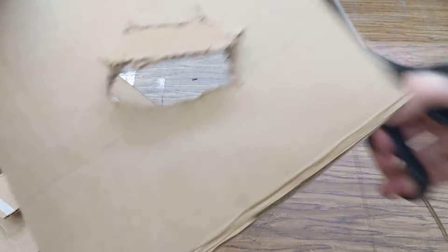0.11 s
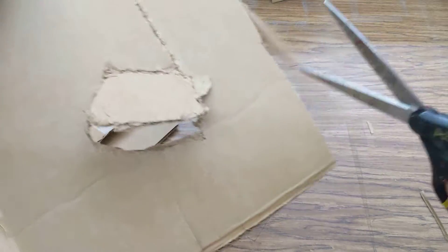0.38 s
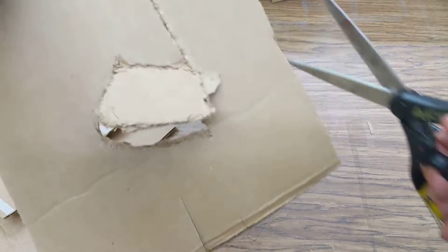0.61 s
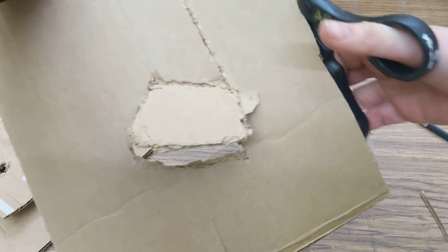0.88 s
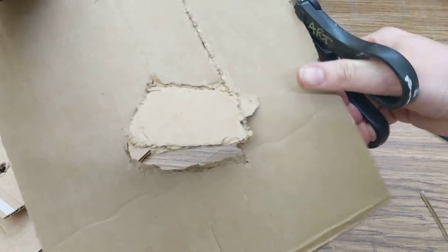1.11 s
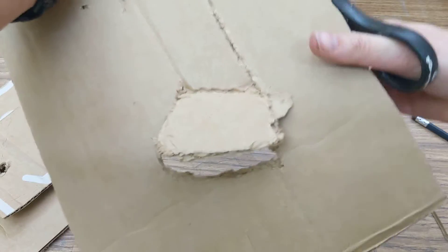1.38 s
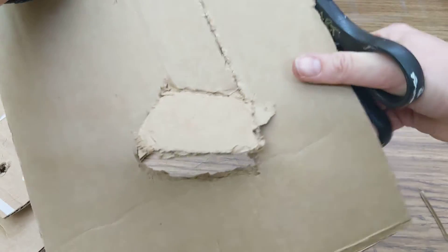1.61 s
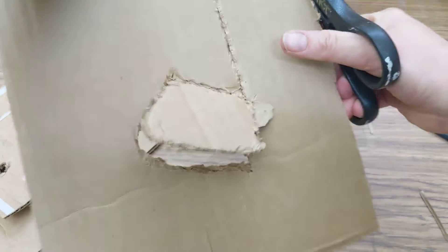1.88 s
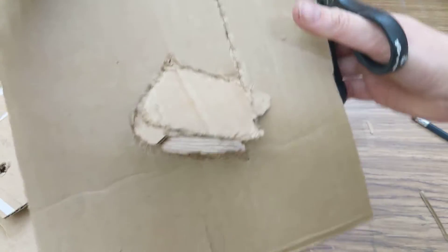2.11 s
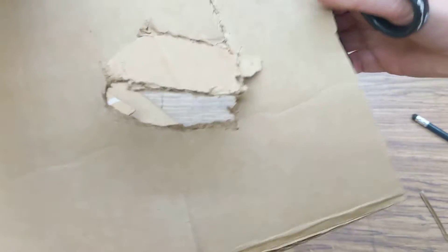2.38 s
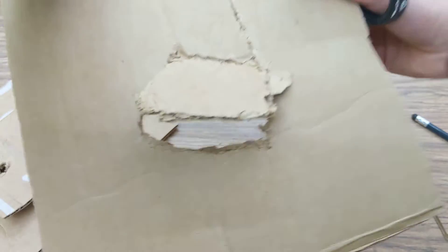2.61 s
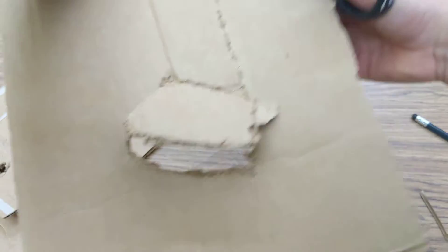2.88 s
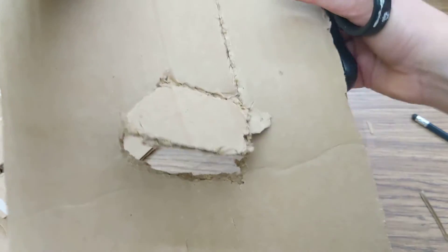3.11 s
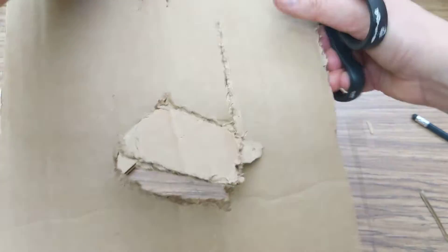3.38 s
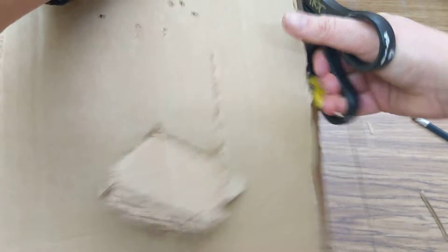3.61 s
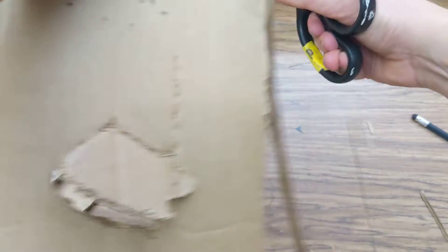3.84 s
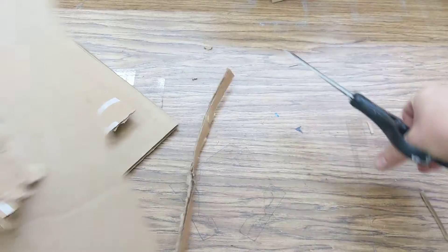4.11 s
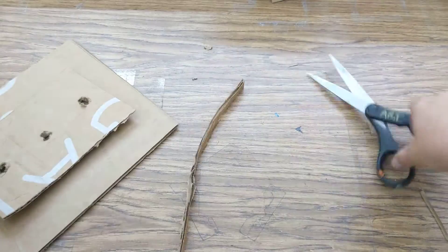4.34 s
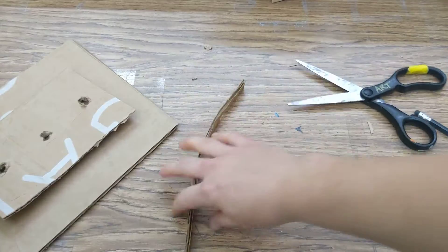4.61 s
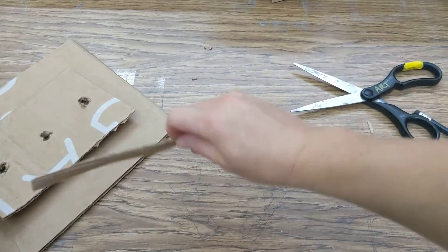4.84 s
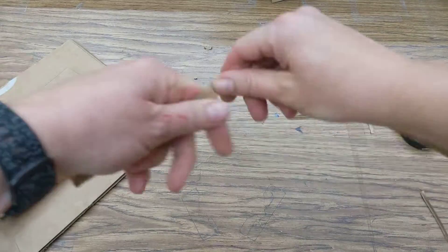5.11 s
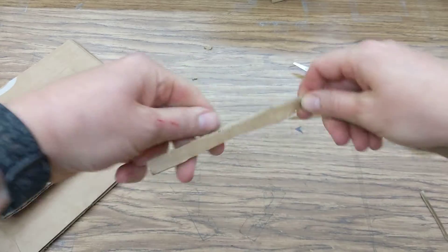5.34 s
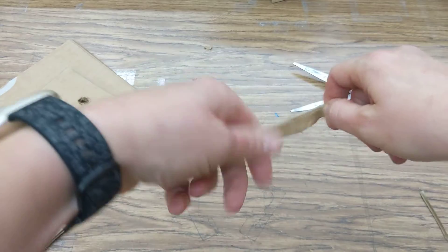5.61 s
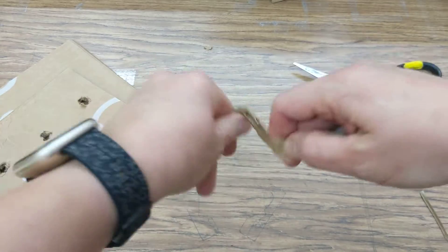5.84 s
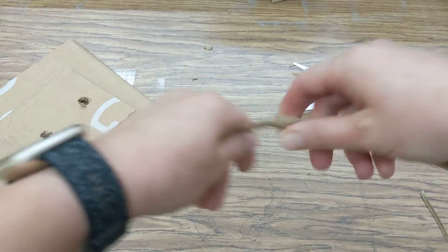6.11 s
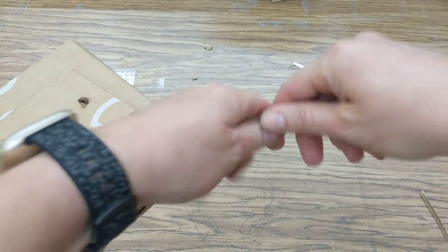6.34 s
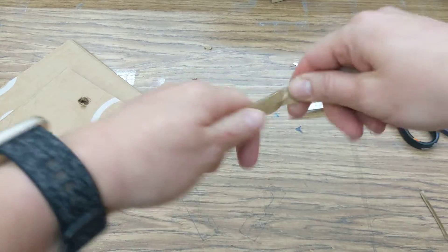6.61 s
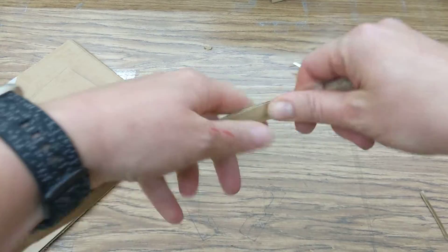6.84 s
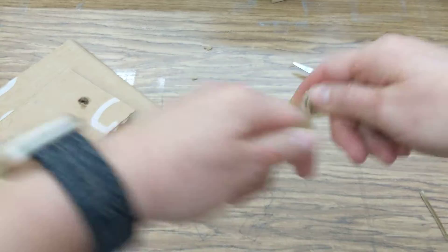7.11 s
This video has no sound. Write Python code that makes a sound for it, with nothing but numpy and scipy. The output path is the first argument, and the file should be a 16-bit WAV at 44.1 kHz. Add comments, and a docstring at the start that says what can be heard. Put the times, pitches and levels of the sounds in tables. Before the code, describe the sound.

Gritty close-up scissor cuts make a cardboard sheet boom and snap, followed by a metallic table clatter and faint papery rustling in a quiet room.

```python
"""A quiet classroom hums behind while hands rustle a sheet of corrugated cardboard close to the microphone.
Scissors bite through it stroke by stroke: gritty noise hisses, snapping fibres burst, damped sheet modes boom.
Now and then the steel blades clink. Then scissors and strip clatter and scuff onto a wooden table, whose own modes ring.
Last, fingers rub and bend the cut strip: swelling swipes of coloured noise and small bright creases."""
import sys
import numpy as np
from scipy import signal
from scipy.fft import rfft, irfft, next_fast_len
from scipy.io import wavfile
from scipy.ndimage import uniform_filter1d, map_coordinates

SR = 44100
rng = np.random.default_rng(int(sys.argv[2]) if len(sys.argv) > 2 else 0)


def to_wav(sig):
    """Store sig (one row per channel, or 1-D mono) as 16-bit WAV at the path in sys.argv[1].

    Samples outside -1..1 are clipped; the rate is SR.
    """
    pcm = np.clip(np.atleast_2d(sig), -1, 1) * 32767
    pcm = np.round(pcm).astype(np.int16)
    wavfile.write(sys.argv[1], SR, pcm.T)  # frames by channels


def boost_factor(decibels):
    """Convert a level in decibels to a linear amplitude factor."""
    exponent = np.asarray(decibels, float) / 20
    return 10 ** exponent


N = 318402
TIME = np.arange(N) / SR

# Body modes of the held sheet. Each row: frequency in Hz, width in Hz, relative level in dB.
SHEET_MODES = [(231, 37, -3.5), (330, 38, 2.5), (400, 44.3, 3), (485, 26.2, 2), (550, 86, -5),
               (772, 110, -8), (953, 87, -10.5), (1377, 205, -12)]
# Body modes of the wooden table top. Each row: frequency in Hz, width in Hz, relative level in dB.
TABLE_MODES = [(92.8, 13.5, 3), (148, 7.8, -31), (225, 11.9, -5), (461, 48.5, 0), (528, 52, -0.5),
               (540.4, 27, -1.5), (813, 145, -15.5), (985, 56, -21.5), (1036, 27, -19)]
# Colour of torn and rubbed paper. Each row: frequency in Hz, density in dB per Hz.
FIBRE_COLOUR = [(700, -52), (1300, -10), (2000, -4), (2800, -4.5), (5000, -3.5), (8000, -4), (12000, -0.5),
                (14500, -1.5), (15800, -0.5)]
# Colour of fingers on the narrow strip. Each row: frequency in Hz, density in dB per Hz.
STRIP_COLOUR = [(1000, -23.5), (2300, -8.5), (2950, -1), (4000, -1.5), (5100, -0.5), (5850, -1),
                (6600, -1.5), (10000, -1), (15800, 0.5)]


def unit(x):
    """Scales a signal to rms 1."""
    return x / np.sqrt(np.mean(x ** 2) + 1e-20)


def along(points, hz):
    """Reads a curve of (Hz, value) points on a log frequency axis."""
    f, v = np.transpose(points)
    return np.interp(np.log(hz + 1), np.log(f + 1), v)


def wobble(rate):
    """A smooth random curve with rate knots a second."""
    knots = rng.standard_normal(int(N * rate / SR) + 4)
    return map_coordinates(knots, [TIME * rate])


def filtered(x, response):
    """Shapes x by a complex response of frequency."""
    m = next_fast_len(x.shape[-1] + SR // 4)
    hz = np.fft.rfftfreq(m, 1 / SR)
    return irfft(rfft(x, m) * response(hz), m)[..., :x.shape[-1]]


def resonances(modes, hz):
    """Causal sum of (Hz, width Hz, gain dB) resonances with alternating signs."""
    total = 0
    for k, (centre, width, db) in enumerate(modes):
        peak = 1j * hz * width / (centre * centre - hz * hz + 1j * hz * width)
        total = total + (-1) ** k * boost_factor(db) * peak
    return total


def ported(x, lead):
    """Sound reaches the two microphone ports with a phase gap: lead holds (Hz, radians left leads)."""
    both = np.array([x, x]) if x.ndim == 1 else x
    return filtered(both, lambda hz: np.exp(.5j * along(lead, hz) * [[1], [-1]]))


def pair(size, alike, lag):
    """Left and right noise, partly shared, the shared part lag samples later on the right."""
    shared, own = rng.standard_normal(size + 128), rng.standard_normal((2, size))
    delayed = np.interp(np.arange(size) + 64 - lag, np.arange(size + 128), shared)
    both = np.array([unit(shared[64:64 + size]), unit(delayed)])
    alike = np.clip(alike, 0, 1)
    return np.sqrt(alike) * both + np.sqrt(1 - alike) * own


def paper(x, spectrum):
    """Colour of fibres as the near microphone hears them, with its ports' own resonances on top."""
    # Emphasis of near sounds at the microphone. Each row: frequency in Hz, width in Hz, level in dB.
    port_modes = [(3000, 300, -4), (3950, 200, -8), (5860, 300, 0), (7500, 300, -4), (8400, 200, -6),
                  (9700, 550, -3), (11800, 300, -3), (14000, 300, -5)]
    return filtered(x, lambda hz: boost_factor(along(spectrum, hz)) * (.55 + .9 * np.abs(resonances(port_modes, hz))))


def air():
    """Ventilation rumble and a faint hiss as shaped stereo noise, plus a mains hum as a wavering sine."""
    # Room floor. Each row: frequency in Hz, density in dB per Hz.
    floor = [(15, -12), (30, 5.5), (60, -1), (130, -4), (250, -13), (520, -9), (800, -20), (1300, -26),
             (2200, -23.5), (3000, -21), (6000, -27.5), (9000, -33), (12000, -28), (16000, -25.5)]
    # Stereo width of the floor. Each row: frequency in Hz, left-right likeness (1 is mono).
    likeness = [(60, 0.54), (250, 0.67), (600, 0.61), (1500, 0.23), (3000, 0.21), (8000, 0.33)]
    # Stereo phase of the floor. Each row: frequency in Hz, radians by which left leads.
    phase_lead = [(40, -9), (130, 3), (300, -1.6), (600, -3.5), (1200, 2), (6000, -5.5), (9000, 9)]

    def turn(hz):
        return np.arccos(np.clip(along(likeness, hz), -1, 1)) / 2

    noise = rng.standard_normal((2, N))
    mid, side = filtered(noise, lambda hz: boost_factor(along(floor, hz)) * [np.cos(turn(hz)), np.sin(turn(hz))])
    hum = boost_factor(-78.0 + 0.52 * wobble(3.1)) * np.sin(2 * np.pi * 120 * TIME)
    rumble = boost_factor(-61.5 + 0.81 * wobble(0.91)) * unit(np.array([mid + side, mid - side]))
    return ported(rumble + hum, phase_lead)


def rubbing():
    """Blades and fingers drag over the paper: clumped grit hisses, and the body underneath hums along."""
    # Faint rustle of hands on paper. Each row: time in seconds, hiss level in dB, body level in dB.
    rustle = [(0, -56.5, -65.5), (.1, -60, -60.5), (.55, -66.5, -63.5), (.9, -83, -78), (1.1, -65, -64),
              (2.1, -56, -60.5), (2.3, -76, -74), (2.6, -56.5, -61), (3.6, -60.5, -60.5), (4.3, -61, -67),
              (4.7, -53.5, -41.5), (5.1, -59, -59), (5.3, -59.5, -58.5), (5.66, -58.5, -71),
              (6.0, -64.5, -77.5), (6.5, -55, -82), (6.87, -65.5, -85), (7.22, -52, -73)]
    # Blades close or slide open along the cut.
    # Each row: start in seconds, length in seconds, then hiss, body and sway level in dB at the stroke's end.
    cuts = [(.145, 0.16, -45, -52.5, -62), (.32, .03, -52.5, -53.5, -53), (.35, 0.079, -52.5, -63, -75),
            (.45, 0.056, -50.5, -59, -76), (.922, 0.034, -47, -47.5, -47), (.955, 0.072, -52, -60.5, -64),
            (1.02, 0.048, -48.5, -60, -60), (1.155, 0.031, -62.5, -64, -57),
            (1.19, 0.12, -47, -50.5, -52.5), (1.435, 0.085, -43, -56, -60), (1.575, .12, -43.5, -42.5, -48),
            (1.825, 0.069, -39.5, -51.5, -56), (1.955, 0.13, -39, -41.5, -49.5),
            (2.17, 0.048, -62.5, -62, -72), (2.457, 0.043, -42, -45.5, -42), (2.53, 0.029, -64, -57, -59),
            (2.59, 0.057, -53, -57.5, -60), (2.63, 0.042, -47.5, -42.5, -51), (2.73, 0.13, -41, -40, -46),
            (2.88, 0.038, -50.5, -62, -70), (3.0, 0.05, -40, -47, -51.5), (3.12, .085, -35, -34, -52),
            (3.205, 0.031, -41.5, -44, -44), (3.345, 0.055, -41.5, -48, -48.5),
            (3.455, 0.1, -41.5, -40, -45), (3.58, 0.046, -47.5, -59, -73),
            (3.785, 0.038, -37, -46.5, -53.5), (3.88, 0.11, -53, -50.5, -60),
            (3.97, 0.066, -47.5, -56, -60), (4.12, 0.064, -65.5, -57.5, -49.5)]
    # Scissors and strip scuff over the table.
    # Each row: start in seconds, length in seconds, then hiss and body level in dB at the scuff's end.
    scuffs = [(4.425, 0.098, -44, -47), (4.53, 0.035, -40, -37.5), (4.59, 0.028, -34.5, -33.5),
              (4.65, 0.053, -40.5, -28.5), (4.81, 0.1, -48.5, -39.5), (4.96, 0.092, -51, -50.5),
              (5.05, .05, -54, -46), (5.125, 0.031, -56, -40), (5.19, 0.042, -54.5, -60.5)]
    # Fingers slide along the strip, press ever harder and stop.
    # Each row: start in seconds, length in seconds, final hiss level in dB.
    swipes = [(5.37, 0.12, -49), (5.68, .12, -56), (5.88, .08, -57), (6.08, 0.049, -52), (6.26, 0.09, -50),
              (6.435, 0.014, -56), (6.56, 0.075, -44), (6.7, 0.09, -51.5), (6.79, 0.037, -61),
              (6.96, 0.043, -57), (7.05, 0.036, -54.5), (7.11, 0.064, -48)]
    put_down_s, lifted_s = 4.38, 5.3  # sheet laid aside, strip in both hands

    # Gain curves
    s, *levels = np.transpose(rustle)
    cut = strokes(cuts, rise_s=0.0079, fade_s=0.0087, swell_db=3.5)
    scuff = strokes(scuffs, rise_s=0.0014, fade_s=0.021, swell_db=-4.5)
    hands = np.array([boost_factor(np.interp(TIME, s, c)) for c in levels])
    hiss, body = hands + cut[:2] + scuff
    hiss = hiss + strokes(swipes, rise_s=.02, fade_s=0.0076, swell_db=6.5)[0]

    # Grit: clumped noise, with crackle until the strip is lifted
    clumps = 1.1 * wobble(40) + 2.1 * wobble(150)  # dB
    fibres = (rng.random(N) < 250 / SR) * boost_factor(3.4 * rng.exponential(size=N))  # single fibres let go, a few hard
    spikes = np.convolve(fibres, np.exp(-np.arange(200) / 30))[:N]
    crackle = 1 + .4 * np.minimum(spikes, 5) * (TIME < lifted_s)
    noise = pair(N, alike=0.94, lag=8 + 9 * wobble(1.2))  # the hand moves, so the lag drifts
    grit = patchy(crackle * boost_factor(clumps + 0.85 * wobble(1800)) * noise, depth_db=2)

    # Cross-fade from sheet to strip, which leans half a dB to the right
    strip = np.clip((TIME - lifted_s) / .1, 0, 1)
    pan = boost_factor(0.5 * strip * [[-.5], [.5]])
    colour = unit(paper(grit, FIBRE_COLOUR)) * (1 - strip) + unit(paper(grit, STRIP_COLOUR)) * strip

    # The same clumps drive the body of sheet and table
    drag = boost_factor(clumps + 3.94 * wobble(80)) * pair(N, alike=0.87, lag=0)
    # a hand resting on the table deadens it
    damped = [(hz, 2.03 * w, db - 5 * (hz < 300) + 5 * (hz > 600)) for hz, w, db in TABLE_MODES]
    board = unit(filtered(drag, lambda hz: resonances(SHEET_MODES, hz)))
    wood = unit(filtered(drag, lambda hz: resonances(damped, hz)))
    held = TIME < put_down_s
    return hiss * pan * colour, body * board * held + sway(cut[2]), body * wood * ~held


def patchy(x, depth_db):
    """Random gain patches over time and frequency: each bit of board sounds its own colour."""
    z = signal.stft(x, nperseg=256)[2]
    field = uniform_filter1d(rng.standard_normal(z.shape[1:]), size=8, axis=0)
    field = uniform_filter1d(field, size=6, axis=1)
    return signal.istft(z * boost_factor(depth_db * unit(field)), nperseg=256)[1][:, :N]


def strokes(rows, rise_s, fade_s, swell_db):
    """One gain curve per level column: each stroke rises, drifts by swell_db up to its end, then fades."""
    out = np.zeros((len(rows[0]) - 2, N))
    for s, length, *levels in rows:
        t = np.clip(TIME - s, 0, None)
        rise = 1 - np.exp(-(t / rise_s) ** 2)
        swell = boost_factor(swell_db * (np.minimum(t / length, 1) - 1))
        fade = np.exp(-np.clip(t - length, 0, None) / fade_s)
        out += boost_factor(np.array(levels))[:, None] * rise * swell * fade
    return out


def sway(push):
    """The whole sheet flexes slowly, pushed by each stroke: low resonant noise under a lagging gain."""
    # Flexing modes of the sheet. Each row: frequency in Hz, width in Hz, relative level in dB.
    flex_modes = [(50, 40, -5.5), (93.4, 26, 0), (127.4, 39, -3.5)]
    lag_s = 0.032  # the heavy sheet follows the blades late
    flex = unit(filtered(rng.standard_normal(N), lambda hz: resonances(flex_modes, hz)))
    late = filtered(push, lambda hz: 1 / (1 + 2j * np.pi * hz * lag_s))
    return late * boost_factor(0.78 * wobble(16)) * flex


def knock(modes, rise_s):
    """Damped modes from (Hz, width Hz, dB) ring with a soft start, scaled to peak 1."""
    t = np.arange(SR // 4) / SR
    ring = 0
    for hz, w, db in modes:
        tone = np.sin(2 * np.pi * (hz * t + rng.normal(0, 0.18)))
        ring = ring + boost_factor(db) * np.exp(-np.pi * w * t) * tone
    ring = ring * (1 - np.exp(-(t / rise_s) ** 2))
    return ring / np.abs(ring).max()


def sheet():
    """The held sheet booms at each bite; grip and bend decide which mode leads, a hard bite wakes the upper ones."""
    # Booms. Each row: start in seconds, peak level in dB, leading mode in Hz, upper modes in dB.
    booms = [(0.2, -32, 400, -15), (0.3305, -36.5, 410, 3), (.39, -34, 485, -22), (.405, -39, 485, -14),
             (.42, -42, 494, -14), (0.4693, -41, 330, 16), (.496, -43, 430, -2), (.9333, -35.5, 330, 23),
             (1.023, -39, 430, 7), (1.2422, -31.5, 370, 7), (1.279, -45, 370, 4), (1.5871, -34.5, 410, 8),
             (1.622, -44, 390, 15), (1.6593, -30.5, 360, 9.5), (1.712, -19.5, 520, 9.5),
             (1.8485, -33, 370, 7.5), (1.9538, -41.5, 230, -18), (2.0115, -22, 360, 24.5),
             (2.0396, -20, 260, 9), (2.204, -44.5, 520, 9), (2.4715, -41, 350, 6.5),
             (2.498, -31.5, 400, -5), (2.635, -16.5, 230, 0), (2.7707, -27.5, 230, -13.5),
             (2.801, -30, 240, -11), (2.8352, -23.5, 340, 4), (2.9543, -29.5, 230, -3.5),
             (2.9812, -30.5, 240, -4.5), (3.2286, -24.5, 320, 7), (3.3926, -39, 390, 10),
             (3.46, -29.5, 320, 4), (3.513, -24.5, 530, -6), (3.5581, -23, 470, 16), (3.624, -42.5, 470, 6),
             (3.8158, -29, 440, -6.5), (3.958, -15.5, 230, 21.5), (4.1536, -43.5, 540, 3)]
    boom_width_hz = 36  # damping of the leading mode in the hand
    out = np.zeros(N + SR)
    for s, db, lead_hz, upper_db in booms:
        modes = []
        for hz, w, level in SHEET_MODES:
            woken_db = upper_db if hz > 600 else -3 - 9 * abs(np.log2(hz / lead_hz))
            modes.append((hz * (1 + rng.normal(0, 0.042)), w, level + woken_db + rng.normal(0, 2.9)))
        ring = knock(modes + [(lead_hz, boom_width_hz, 0)], rise_s=0.0014)
        out[round(s * SR):][:len(ring)] += boost_factor(db) * ring
    return out[:N]


def burst(length, alike, grain_db, tail_s):
    """A ragged run of tiny fractures: quick swell, plateau, sudden fall into a short tail."""
    t = np.arange(SR // 12) / SR
    length = max(length, .0008)
    swell = 1 - np.exp(-(t / (0.1 * length)) ** 2)
    shape = swell * (np.exp(-(t / length) ** 3) + 0.19 * np.exp(-t / tail_s))
    ragged = boost_factor(grain_db * np.interp(t * 900, np.arange(100), rng.standard_normal(100)))
    open_rms = np.sqrt(np.sum((shape * ragged) ** 2) / np.sum(shape ** 2))  # where the envelope is open
    return pair(len(t), alike, lag=rng.uniform(-19.5, 33.73)) * shape * ragged / open_rms


def cracks(rows):
    """Noise bursts of breaking or struck fibre, each with its own balance below and above about 4.5 kHz."""
    out = np.zeros((2, N + SR))
    for s, db, length, tilt_db in rows:
        lift = boost_factor(tilt_db)
        noise = burst(length, alike=0.83, grain_db=3, tail_s=0.0097)
        crack = filtered(noise, lambda hz: 1 + (lift - 1) / (1 + (hz / 4500) ** 6))
        out[:, round(s * SR):][:, :crack.shape[1]] += boost_factor(db) * crack
    return out[:, :N]


def fractures():
    """Fibres part under the blades, scissors and strip hit the table, the strip buckles: coloured bursts."""
    # In all three, each row: start in seconds, level in dB before the paper colour, length in seconds,
    # lift below 4.5 kHz in dB.
    snaps = [(.3821, -39, .0086, -19), (.4031, -42, 0.012, -19), (.4699, -36.5, 0.0072, 2),
             (.9329, -38.5, .015, 7.5), (1.2382, -37.5, 0.022, 7), (1.5096, -37, 0.021, -7),
             (1.5864, -36, 0.012, 8.5), (1.6153, -33, 0.014, 2), (1.6572, -26, 0.0055, 2.5),
             (1.6722, -30, .0069, -0.5), (1.7101, -14, 0.0084, -6.5), (1.7311, -26.5, 0.0061, 1.5),
             (1.9775, -27, 0.0077, -0.5), (2.0104, -15.5, 0.01, 9.5), (2.0364, -18, 0.008, 0),
             (2.0503, -23.5, 0.007, 3), (2.0793, -37.5, 0.033, -31), (2.4614, -42, 0.0022, -5.5),
             (2.7847, -36, 0.0041, -8.5), (2.8146, -24.5, .006, -5), (2.8395, -24.5, 0.0024, 10),
             (2.8505, -25, 0.0036, 1), (2.897, -30, 0.0095, -14), (3.1275, -29.5, 0.0017, 4),
             (3.1838, -23, 0.0099, 0.5), (3.2287, -23.5, 0.0059, -9), (3.4851, -19.5, .0023, -1),
             (3.511, -17.5, 0.013, 0.5), (3.541, -20.5, 0.0042, -9), (3.5589, -18.5, 0.0063, 1),
             (3.8093, -32.5, 0.0058, -15), (3.948, -30.5, .0027, 4.5), (3.959, -12.5, 0.0058, 7),
             (3.966, -6.5, 0.0031, 2), (4.1246, -43.5, 0.0062, -1), (4.1516, -34, 0.0076, 4.5)]  # fibres part under the blades
    clatter = [(4.363, -43.5, 0.0029, 1.5), (4.3691, -40, .0057, -12.5), (4.4241, -13.5, 0.0046, -7),
               (4.4294, -20.5, 0.015, -15), (4.461, -28, 0.014, -14.5), (4.522, -16.5, 0.013, 7),
               (4.5816, -18, 0.012, 9.5), (4.5946, -18.5, 0.019, -11), (4.6472, -23, 0.017, 4.5),
               (4.671, -22.5, .008, 9), (4.688, -39, .013, 9.5), (4.8063, -27.5, 0.0063, 10.5),
               (4.819, -35, 0.011, 4), (4.866, -45, 0.0039, -2), (4.8663, -32.5, 0.011, 7)]  # scissors and strip meet the table
    creases = [(5.3748, -45.5, 0.003, 5.5), (5.4277, -43.5, 0.0024, 13.5), (5.7958, -41.5, 0.0075, 0),
               (5.8138, -45, 0.012, -6.5), (6.473, -45.5, 0.0042, 8.5), (6.7716, -48, 0.0043, 1),
               (6.9073, -57, .0029, 17.5), (7.04, -53, .003, -1.5), (7.0639, -26.5, 0.0011, -3),
               (7.211, -50, 0.0013, 20.5)]  # the strip buckles
    return paper(cracks(snaps + clatter), FIBRE_COLOUR) + paper(cracks(creases), STRIP_COLOUR)


def blades():
    """The steel rings when the blades shut or land; the struck spot favours modes near one pitch."""
    # Steel meets steel or wood. Each row: start in seconds, level in dB, favoured pitch in Hz.
    clinks = [(3.511, -57, 4210), (3.965, -34.5, 5900), (4.423, -35.5, 7400), (4.525, -16.5, 9450),
              (4.584, -31, 7130), (4.651, -33, 8600), (4.673, -33, 6590)]
    # Modes of the blades. Each row: frequency in Hz, relative level in dB, 60 dB decay time in seconds.
    steel = [(4000, -2, 0.11), (5240, 15.5, 0.059), (5550, 1, 0.0784), (5800, -5.5, 0.036),
             (7400, 2, 0.032), (8190, 4.5, 0.042), (9520, -4, 0.039), (10800, 10, 0.029),
             (11700, -3, 0.0412), (13900, -7, .03)]
    out, t = np.zeros((2, N + SR)), np.arange(SR // 3) / SR
    for s, db, centre_hz in clinks:
        for hz, level, t60 in steel:
            # radians: the loose pivot blurs the tone
            flutter = 2.7 * np.interp(t * 300, np.arange(110), rng.standard_normal(110))
            tone = np.sin(2 * np.pi * (hz * t + rng.random((2, 1))) + flutter)
            tone = tone * (1 - np.exp(-t / 0.00073))
            favour_db = -25 * abs(np.log2(hz / centre_hz))
            gain = boost_factor(db + level + favour_db + rng.normal(0, 2.2) - 60 * t / t60)
            out[:, round(s * SR):][:, :len(t)] += gain * tone
    return out[:, :N]


def table():
    """The table top answers each landing; where it is struck sets the share of its low modes."""
    # Landings. Each row: start in seconds, peak level in dB, modes under 180 Hz in dB, modes at 180-300 Hz in dB.
    landings = [(4.4283, -15, -7, 1), (4.492, -27.5, 3.5, 10), (4.5257, -17, -28.5, -4.5),
                (4.5845, -8, -20.5, -5), (4.6536, -11, -17.5, -14.5), (4.6714, -19.5, -10, -9),
                (4.699, -22, 3, -6), (4.8081, -18.5, -11.5, -11.5), (4.823, -22, -16, -9),
                (4.8683, -28, -20, -25), (4.895, -26.5, -9, -5.5), (5.0354, -31, -5.5, -7),
                (5.0843, -34.5, -2.5, 5.5), (5.1308, -36, -18, 10), (5.155, -36.5, -8, 6.5),
                (5.2068, -38, -6, 11), (7.205, -48, -8, -2)]
    out = np.zeros(N + SR)
    for s, db, deep_db, low_db in landings:
        modes = []
        for hz, w, level in TABLE_MODES:
            struck_db = deep_db if hz < 180 else low_db if hz < 300 else 0
            modes.append((hz, w, level + struck_db + rng.normal(0, 2.16)))
        ring = knock(modes, rise_s=0.0025)
        out[round(s * SR):][:len(ring)] += boost_factor(db) * ring
    return out[:N]


def room(x):
    """Reverb from decaying noise: each frequency of the room's answer dies at its own speed."""
    # Reverberation. Each row: frequency in Hz, 60 dB decay time in seconds.
    decay = [(150, 0.67), (1000, 0.22), (5000, 0.6), (14000, 0.23)]
    hz, t, z = signal.stft(rng.standard_normal((2, SR // 2)), SR, nperseg=256)
    tail = signal.istft(z * boost_factor(-60 * t / along(decay, hz)[:, None]), SR, nperseg=256)[1]
    late = np.pad(x, ((0, 0), (200, 0)))  # samples of pre-delay
    return signal.fftconvolve(late, tail / np.linalg.norm(tail[0]), axes=1)[:, :N]


def scene():
    """Cutting, clatter and bending, in the room."""
    # Stereo phase of sheet and table. Each row: frequency in Hz, radians by which left leads.
    sheet_lead, table_lead = [(40, 0.55), (150, -0.96), (450, -1.3), (700, -1), (1000, 1), (1600, -0.029)], [(40, -1.2), (90, -1.5), (130, -1.6), (300, -2.3),
                                                  (600, -2.2), (1500, -2.8)]
    hiss, board, wood = rubbing()
    sheet_body = ported(board + sheet(), sheet_lead)
    bright = fractures() + blades()
    table_body = ported(wood + table(), table_lead)
    near = hiss + bright + sheet_body + table_body
    return near + boost_factor(-19.0) * room(near) + air()


def low_pass(x):
    """Removes everything above the highest recorded frequency."""
    return signal.sosfilt(signal.butter(12, 16990, fs=SR, output="sos"), x)


def record(dry):
    """Unequal microphone ports, a treble step, soft overload of the input stage and a band limit."""
    # The left port is more sensitive. Each row: frequency in Hz, left over right in dB.
    left_over_right = [(40, 2), (300, 3), (1300, 5), (3000, 6), (8000, 7.5), (15000, 5)]
    shelf_hz, top_hz = 15800, 16900  # treble step and band limit
    ports = filtered(dry, lambda hz: boost_factor(along(left_over_right, hz) * [[.5], [-.5]] - 37 * (hz > shelf_hz)))
    ports = ports / (1 + np.abs(ports / .8) ** 4) ** .25  # saturates towards 0.8
    mix = filtered(ports, lambda hz: hz < top_hz)
    return low_pass(mix)


dry = scene()
out = record(dry)
to_wav(out)
```